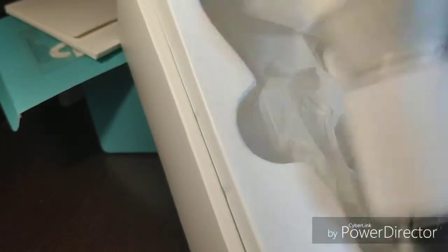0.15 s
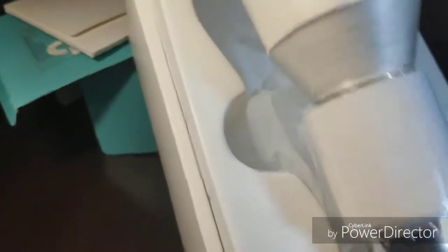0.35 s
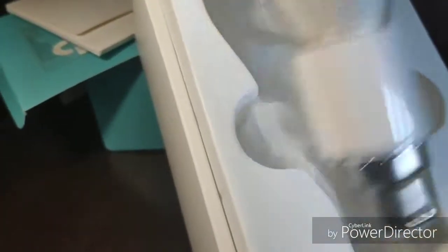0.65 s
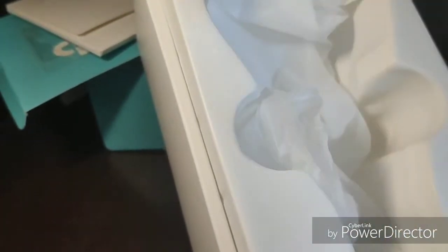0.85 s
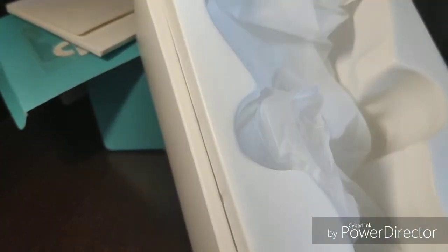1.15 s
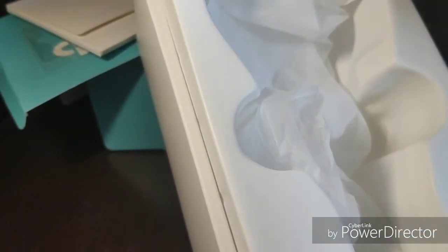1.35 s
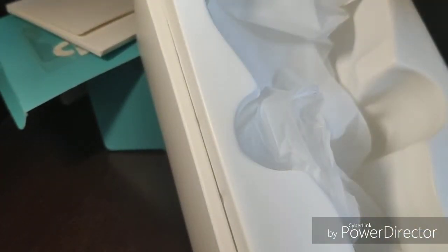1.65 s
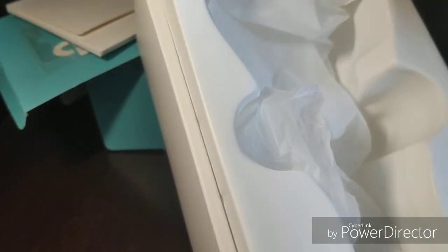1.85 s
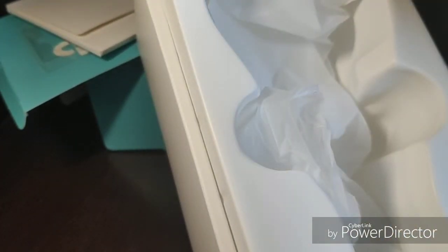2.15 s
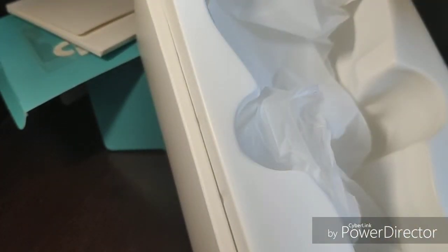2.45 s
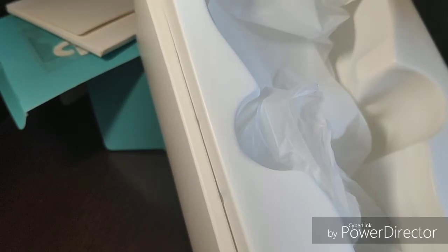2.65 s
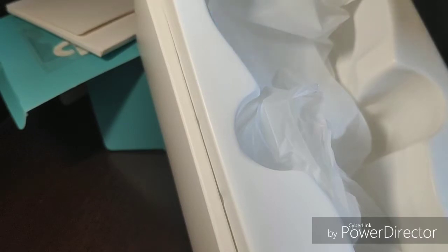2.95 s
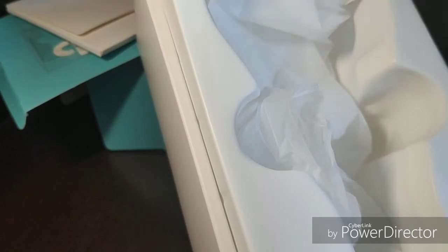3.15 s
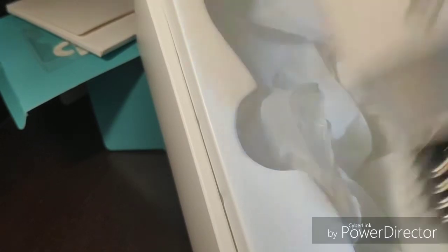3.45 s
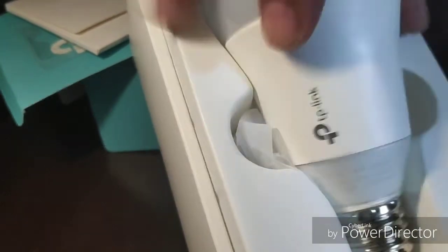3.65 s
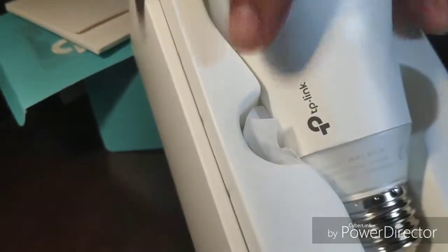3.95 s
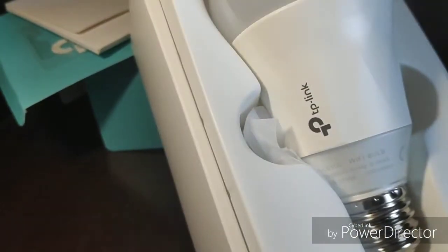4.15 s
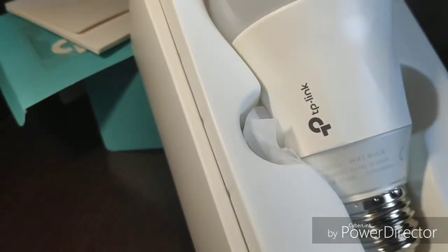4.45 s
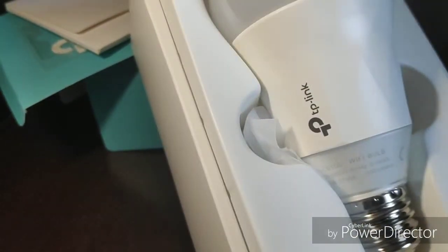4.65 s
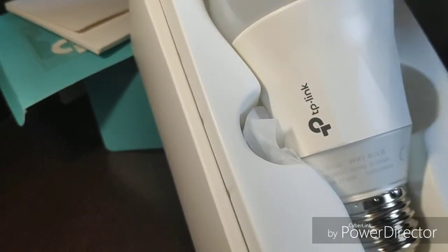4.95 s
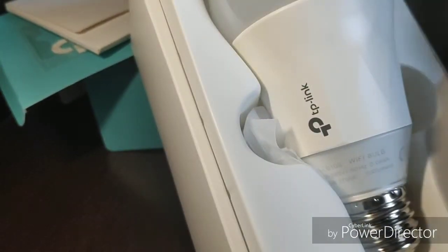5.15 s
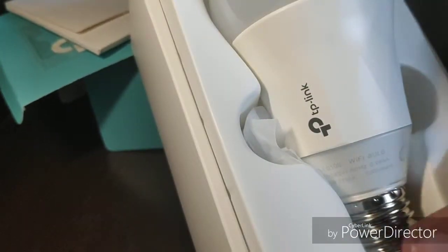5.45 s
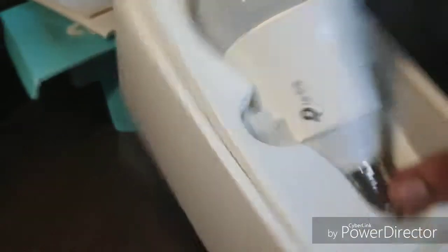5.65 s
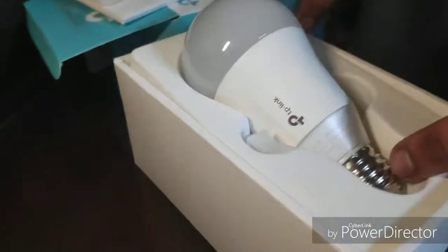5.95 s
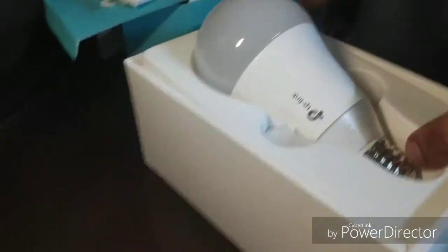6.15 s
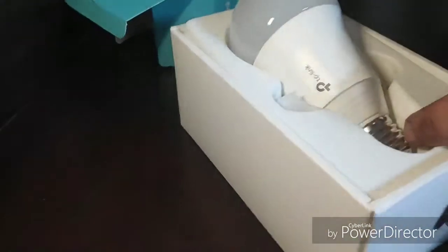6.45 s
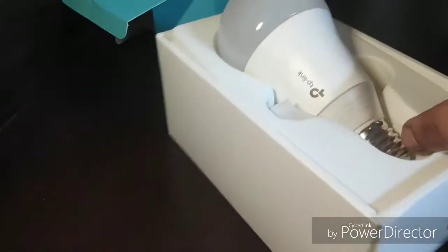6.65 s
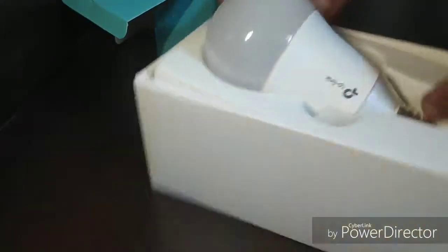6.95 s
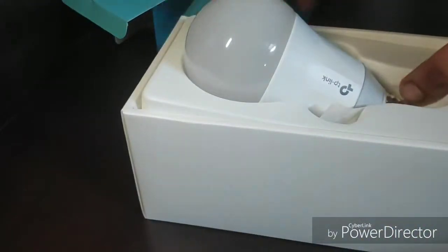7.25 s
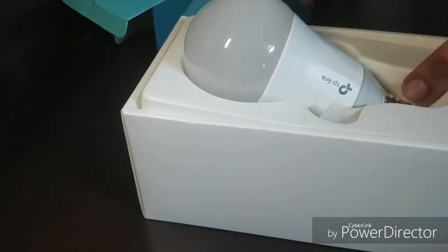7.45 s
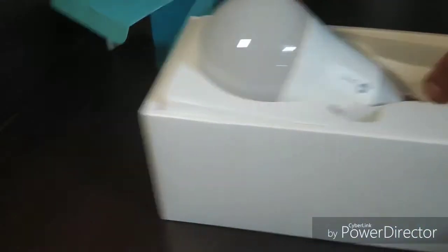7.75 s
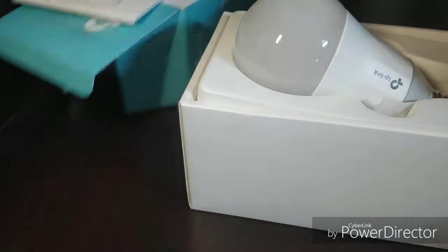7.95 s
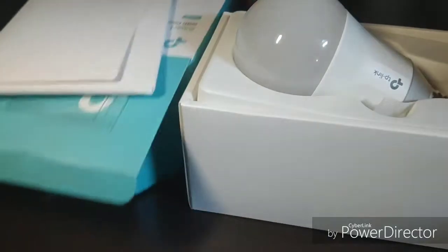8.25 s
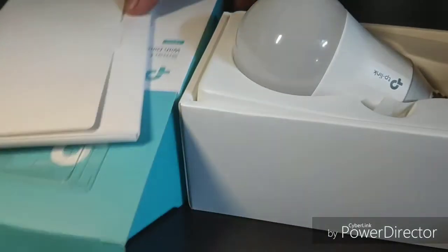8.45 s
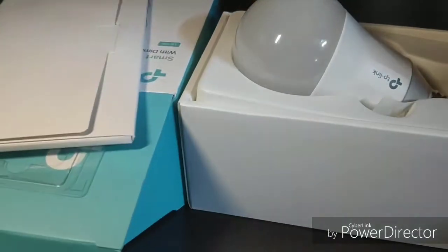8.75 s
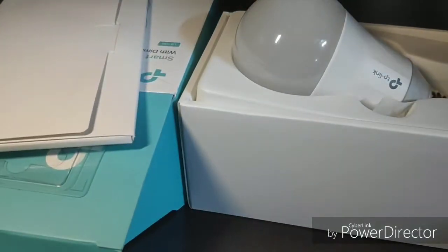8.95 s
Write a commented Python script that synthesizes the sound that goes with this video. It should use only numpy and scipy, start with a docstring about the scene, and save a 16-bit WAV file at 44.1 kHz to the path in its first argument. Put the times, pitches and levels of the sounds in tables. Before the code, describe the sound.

A light bulb knocks into a cardboard tray, paper crackles, then the carton scrapes across a table over a fan's hum.

```python
"""A fan hums in a small room and a hand rumbles on a hand-held recorder throughout.
Close by, a light bulb is set into its paperboard tray: blows ring the carton's panels and thump the table.
Fingers then rub the wrapping paper, which hisses, ticks at its creases and briefly squeaks by stick-slip.
A sharp knock at 3.9 s leaves a hissing tail; more knocks come near 5.8 s. Then the carton is slid about
on the table, hissing, scraping and now and then squeaking."""
import sys
import numpy as np
from scipy import signal
from scipy.fft import rfft, irfft, next_fast_len
from scipy.io import wavfile
from scipy.ndimage import uniform_filter1d

SR = 44100
rng = np.random.default_rng(int(sys.argv[2]) if len(sys.argv) > 2 else 0)


def wav_out(sig):
    """Save sig, one row per channel (or a flat mono array), as 16-bit PCM at SR to the path in sys.argv[1]."""
    wavfile.write(sys.argv[1], SR, np.round(np.clip(np.atleast_2d(sig).T, -1, 1) * 32767).astype(np.int16))


N = 401298
CUTOFF_HZ = 15700


def from_db(db):
    """Decibels to gain."""
    return 10 ** (np.asarray(db) / 20)


def pan(db):
    """Channel gains for a left-minus-right level."""
    return from_db([[db / 2], [-db / 2]])


def unit_rms(x):
    """Scale to an rms of 1."""
    return x / np.sqrt(np.mean(x ** 2) + 1e-20)


def in_time(points):
    """Read a (seconds, value) curve at every sample."""
    return np.interp(np.arange(N) / SR, *np.transpose(points))


def at_hz(points, hz):
    """Read a (Hz, value) curve on a log-frequency axis."""
    point_hz, value = np.transpose(points)
    return np.interp(np.log(np.maximum(hz, 1)), np.log(point_hz), value)


def drift(rate_hz):
    """Random curve through unit-variance points."""
    steps = unit_rms(rng.standard_normal(N // 8))
    return np.interp(np.arange(N) / SR * rate_hz, np.arange(len(steps)), steps)


def colour(x, spectrum, size=1024):
    """Minimum-phase filter with the given spectrum."""
    gain = from_db(at_hz(spectrum, np.fft.rfftfreq(size, 1 / SR)))
    cepstrum = irfft(np.log(gain))[:size // 2]
    cepstrum[1:] *= 2
    response = irfft(np.exp(rfft(cepstrum, size)))[:size // 2]
    return signal.oaconvolve(x, response[None], axes=-1)[:, :x.shape[-1]]


def stereo_noise(coherence, size=N):
    """White noise whose channels are alike by frequency."""
    padded = next_fast_len(size, True)
    mid, side = rfft(rng.standard_normal((2, padded)))
    alike = np.clip(at_hz(coherence, np.fft.rfftfreq(padded, 1 / SR)), 0, 1)
    spectra = np.sqrt(1 + alike) * mid + np.sqrt(1 - alike) * side * [[1], [-1]]
    return unit_rms(irfft(spectra, padded)[:, :size])


def resonate(x, hz, width_hz):
    """One resonance with a peak gain of 1."""
    r = np.exp(-np.pi * width_hz / SR)
    poles = [1, -2 * r * np.cos(2 * np.pi * hz / SR), r * r]
    return signal.lfilter(np.array([1, 0, -1]) * (1 - r * r) / 2, poles, x + 1e-18)


def at_level(x, db):
    """Give a short sound the energy of 5 ms at this level."""
    return from_db(db) * x * np.sqrt(.005 * SR / np.mean(np.sum(x ** 2, axis=-1)))


def add(out, start_s, sound):
    """Mix a short sound in."""
    at = int(start_s * SR)
    out[:, at:at + sound.shape[1]] += sound[:, :N - at]


def strokes(rows, attack_s, release_db_per_s, arch_db=6.5):
    """Gain of (start s, length s, dB) strokes: each sets in, is loudest midway and dies away."""
    t, power = np.arange(0, N, 32) / SR, 1e-12
    for start_s, length_s, db in rows:
        rise = np.clip((t - start_s) / attack_s, 0, 1)
        progress = np.clip((t - start_s) / length_s, 0, 1)
        release_db = release_db_per_s * np.maximum(t - start_s - length_s, 0)
        power += (rise * from_db(db - arch_db * (2 * progress - 1) ** 2 - release_db)) ** 2
    return np.interp(np.arange(N) / SR, t, np.sqrt(power))


# Diffuse sound. Each row: frequency in Hz, channel coherence 0-1.
ROOM_COHERENCE = [(40, 0), (150, 1), (500, 0.47), (1100, 0.37), (2500, 0)]
# Air noise. Each row: frequency in Hz, gain in dB.
FAN_SPECTRUM = [(30, -2), (130, -1), (280, 3), (380, 0), (470, -1.5), (800, -3.5), (1150, 3), (1320, -2),
                (1500, -7.5), (2400, -9.5), (4000, -16), (6500, -22.5), (10000, -27), (15500, -22)]


def fan(air_db=-45.5, hum_db=-56, hum_hz=333.4, waver_hz=5.69, flutter_db=2.5):
    """Steady air noise with a wavering hum."""
    air = unit_rms(colour(stereo_noise(ROOM_COHERENCE), FAN_SPECTRUM, size=8192))
    phase = 2 * np.pi * np.cumsum(hum_hz + waver_hz * drift(40)) / SR
    hum = unit_rms(np.sin(phase) * from_db(flutter_db * drift(22)))
    return from_db(air_db) * air + from_db(hum_db) * hum * pan(-3)


# Resting hand. Each row: time in seconds, level in dB before trim.
GRIP_REST = [(0.0, -38.5), (2.05, -45), (2.51, -36.5), (3.45, -50.5), (3.83, -39), (5.09, -57.5),
             (5.58, -46.5), (8.31, -48), (8.64, -37), (9.1, -50)]
# Grip shifts. Each row: start in seconds, length in seconds, level in dB, left minus right in dB.
GRIP_SHIFTS = [(1.23, 0.17, -33, 9), (1.349, 0.084, -28, 12), (2.223, 0.2, -32.5, -2),
               (2.86, 0.29, -33, -2), (3.483, 0.072, -41.5, 7), (3.624, 0.52, -45, -13),
               (4.434, 0.047, -36, 5), (5.568, 0.075, -33.5, 0), (6.267, 0.27, -36, 5),
               (7.4, 0.29, -37.5, -3), (8.383, 0.17, -33, 5), (8.587, 0.65, -35.5, 11.5)]
# Case rumble. Each row: frequency in Hz, gain in dB.
CASE_SPECTRUM = [(12, -4.5), (30, 1), (55, -3.5), (90, -7.5), (160, -16.5), (300, -25), (700, -56.5),
                 (2000, -66)]
# Case-borne sound. Each row: frequency in Hz, channel coherence 0-1.
CASE_COHERENCE = [(20, 0.09), (300, 0.52)]


def grip(rest_trim_db=-1, lumpy_db=3.5, creak_hz=98, creak_db=-9.5):
    """The hand rumbles through the recorder's case; a hard squeeze adds a dull creak."""
    shoves = stereo_noise(CASE_COHERENCE) * from_db(lumpy_db * drift(30))
    resting = from_db(in_time(GRIP_REST) + rest_trim_db) * pan(2)
    shifting = []
    for side in (1, -1):
        rows = [(s, length_s, db + side * pan_db / 2) for s, length_s, db, pan_db in GRIP_SHIFTS]
        shifting.append(strokes(rows, attack_s=0.013, release_db_per_s=260))
    force = np.hypot(resting, shifting)
    rumble = unit_rms(colour(shoves, CASE_SPECTRUM, size=8192))
    creak = unit_rms(resonate(resonate(shoves, creak_hz, 48), creak_hz, 48))
    return (rumble + from_db(creak_db) * creak * force / force.max()) * force


# Close sound. Each row: frequency in Hz, channel coherence 0-1.
NEAR_COHERENCE = [(100, 0.95), (1000, 0.81), (3000, 0.53), (15000, 0.2)]


def contact(crush_s, snap, rise_s=0.00045, size=4096):
    """One sharp push of height snap, then a dying burst of tiny slips as the fibres give."""
    t = np.arange(size) / SR
    slips = stereo_noise(NEAR_COHERENCE, size) * np.exp(-t / crush_s) * (1 - np.exp(-t / rise_s))
    slips /= np.sqrt(np.sum(slips ** 2) / 2)
    return slips + snap * (t == 0)


# Blows on the carton. Each row: start in seconds, panel, hollow, crack and thump levels in dB,
# crush time in seconds, left minus right of the ringing in dB, panel pitch ratio.
CARTON_KNOCKS = [(0.2748, -12, -29, -15, -33, 0.0026, -1, 1),
                 (0.2825, -25, -34, -32, -36, 0.0012, -1, 1.08),
                 (0.2985, -24, -36, -28, -40, 0.0025, 1, 1.1), (0.3082, -24, -31, -28, -42, 0.002, -1, 1),
                 (0.3122, -24, -32, -36, -42, 0.0025, 0, 0.9),
                 (0.3198, -23.5, -38, -32, -45, .002, -3, 1.02),
                 (0.3369, -11.5, -23, -22.5, -28, 0.0008, 0, 1.02),
                 (0.340, -20, -30, -28, -36, 0.001, 0, 1.05), (0.3782, -27, -33, -46, -39, 0.001, 0, 1),
                 (0.5224, -18, -29, -37, -34, 0.0009, -1, 1.06), (0.556, -33, -36, -46, -42, .003, 0, 0.9),
                 (0.621, -37, -35, -42, -36, 0.005, 2, 0.89),
                 (3.737, -31.5, -32, -36, -52, 0.0075, -1.5, 0.95),
                 (3.776, -38, -31, -50, -55, 0.0015, 3, 0.96), (3.7885, -50, -40, -35, -55, 0.001, -6, 1),
                 (3.902, -28.5, -25, -13, -31, 0.0022, -6, 1.22),
                 (5.745, -36, -35, -44, -47, 0.03, -2, 0.6), (5.8472, -15, -22, -9, -17, 0.0035, -2, 0.82),
                 (5.8505, -16, -30, -18, -30, .0025, 0, 1.43),
                 (5.854, -19.5, -16, -15.5, -16, 0.0035, -3, 0.6)]
# Panel resonances. Each row: frequency in Hz, width in Hz, gain in dB.
PANEL_MODES = [(296, 210, -7), (523, 158, -1.5), (880, 157, 4), (1150, 210, 0), (1880, 280, -1),
               (2350, 560, -4), (2850, 600, -5.5)]
# Edge crack. Each row: frequency in Hz, gain in dB.
CRACK_SPECTRUM = [(100, -5.5), (300, -3), (900, 1.5), (1700, 5), (2400, 4.5), (3200, 0.5), (4100, 2),
                  (5400, 4), (7000, 2), (9500, -1), (15500, 9)]


def knocks():
    """A blow cracks at the edge, rings the panels and the tray's hollow, and thumps the table."""
    out = np.zeros((2, N))
    for start_s, panel_db, hollow_db, crack_db, thump_db, crush_s, pan_db, pitch in CARTON_KNOCKS:
        force, push = contact(crush_s, snap=1.3), contact(crush_s, snap=0.89)
        # a blunt blow, with little crack, spares the high modes
        tilt_db_per_octave = 0.79 * min(crack_db - panel_db - 0.5, 0)
        panels = 0
        for k, (hz, width_hz, db) in enumerate(PANEL_MODES):
            gain = from_db(db + tilt_db_per_octave * max(np.log2(hz / 1000), 0))
            panels += (-1) ** k * gain * resonate(force, hz * pitch, width_hz)
        crack = at_level(colour(contact(crush_s, snap=0.2), CRACK_SPECTRUM), crack_db)
        hollow = at_level(resonate(push, hz=560, width_hz=46), hollow_db)
        thump = at_level(resonate(push, hz=150, width_hz=75), thump_db)
        ringing = at_level(panels, panel_db) - hollow - thump
        add(out, start_s, ringing * pan(pan_db) + crack)
    return out


def room(x, tail_db=-13, boom_db=-9.5, build_s=0.0008, size=32768):
    """A diffuse tail swells and dies, treble first; the low room modes boom on longest."""
    treble_t60_s, mid_t60_s, boom_t60_s = 0.35, 0.43, 0.55
    treble_hz, boom_hz, boom_width_hz = 7040, 140, 130
    t = np.arange(size) / SR
    echoes = stereo_noise(ROOM_COHERENCE, size) * (1 - np.exp(-t / build_s))
    dull = signal.sosfiltfilt(signal.butter(2, treble_hz, fs=SR, output="sos"), echoes)
    tail = dull * from_db(-60 * t / mid_t60_s) + (echoes - dull) * from_db(-60 * t / treble_t60_s)
    modes = resonate(resonate(echoes, boom_hz, boom_width_hz), boom_hz, boom_width_hz)
    boom = modes * from_db(-60 * t / boom_t60_s)
    response = (from_db(tail_db) * tail + from_db(boom_db) * boom) / np.sqrt(np.sum(tail ** 2) / 2)
    return signal.oaconvolve(x, response, axes=-1)[:, :N]


def rasp(x, depth_db, size=512):
    """Patches of the surface catch and sing for some 20 ms, each at its own pitch."""
    frames = signal.stft(x, nperseg=size)[2]
    patches = rng.standard_normal(frames.shape[1:])
    patches = uniform_filter1d(uniform_filter1d(patches, size=4, axis=0), size=3, axis=1)
    return signal.istft(frames * from_db(depth_db * unit_rms(patches)), nperseg=size)[1][:, :N]


def friction(slips, spectrum, grain_db, pressure_db):
    """Countless tiny slips, roughened by surface grain and wavering hand pressure."""
    rough = slips * from_db(grain_db * drift(2500) + pressure_db * drift(90))
    return unit_rms(colour(rough, spectrum, size=2048))


# Carton or bulb sliding. Each row: start in seconds, length in seconds, hiss in dB, scrape in dB.
CARD_SLIDES = [(0.34, .03, -57, -55), (0.545, 0.083, -36.5, -40.5), (3.685, 0.1, -57, -45),
               (5.63, 0.2, -51, -45), (5.81, 0.14, -56, -41.5), (6.047, 0.47, -50, -51),
               (6.095, 0.03, -50, -47), (6.263, 0.23, -40, -48), (6.517, 0.74, -55.5, -58),
               (6.595, 0.03, -45, -55), (6.697, 0.03, -48, -55), (6.915, 0.25, -37.5, -43),
               (7.55, 0.11, -53, -56), (7.829, 0.22, -38, -45), (7.993, 0.31, -39.5, -53.5),
               (8.245, 0.15, -42, -49), (8.398, 0.21, -42, -49.5)]
# Card hiss and low scrape. Each row: frequency in Hz, gain in dB.
HISS_SPECTRUM = [(300, -12), (1200, -10), (2700, -7), (4000, -1), (6300, 2.5), (8000, -1), (9500, -1.5),
                 (12500, 2), (15500, 4.5)]
SCRAPE_SPECTRUM = [(150, 1.5), (550, 4.5), (900, -0.5), (1400, 0), (2800, 3.5), (4500, -4), (8000, -30),
                   (15000, -6)]


def sliding(noise, attack_s=0.046, release_db_per_s=175):
    """Sliding card hisses evenly and scrapes lower down."""
    slides = np.array(CARD_SLIDES)
    hiss_gain = strokes(slides[:, [0, 1, 2]], attack_s, release_db_per_s)
    scrape_gain = strokes(slides[:, [0, 1, 3]], attack_s, release_db_per_s)
    slips = rasp(noise, depth_db=3)
    hiss = friction(slips, HISS_SPECTRUM, grain_db=0.5, pressure_db=0.8)
    scrape = friction(slips[:, ::-1], SCRAPE_SPECTRUM, grain_db=-1, pressure_db=3.5)
    return hiss_gain * hiss + scrape_gain * scrape


# Creasing paper. Each row: start in seconds, level in dB, crush time in seconds.
CREASE_TICKS = [(0.469, -52, .002), (0.603, -31, .004), (0.783, -52, .003), (1.701, -37, 0.0049),
                (1.732, -35.5, 0.0047), (1.764, -38, 0.0037), (1.815, -40, .005), (1.833, -34, 0.0059),
                (1.849, -32, .005), (1.86, -25, 0.0029), (2.031, -45, .004), (2.079, -30, 0.0063),
                (2.289, -38, 0.0014), (2.2995, -27, 0.0016), (2.364, -33, 0.0039), (2.678, -46, .006),
                (2.693, -42, .003), (2.750, -23, 0.0028), (3.703, -38, 0.001), (3.725, -35, .001),
                (3.751, -36, .001), (3.847, -36, 0.00083), (5.039, -49, .001), (5.116, -55, .001),
                (5.164, -46, .002), (5.178, -46, 0.0014), (6.224, -43, .004), (7.31, -53, .004),
                (8.472, -36, 0.0036)]
# Paper snap. Each row: frequency in Hz, gain in dB.
TICK_SPECTRUM = [(300, -19), (2000, -2), (3800, -6), (5000, 1), (6300, 7.5), (10000, 0.5), (13000, 14),
                 (15500, 6)]


def ticks():
    """Creases snap too lightly to move the panels."""
    out = np.zeros((2, N))
    for start_s, db, crush_s in CREASE_TICKS:
        add(out, start_s, at_level(colour(contact(crush_s, snap=0.18), TICK_SPECTRUM), db))
    return out


def crackle(snaps_per_s=900, spread_db=8, level_db=-11):
    """Single paper fibres snag and snap at random, a few much louder than the rest."""
    snaps = (rng.random(N) < snaps_per_s / SR) * rng.standard_normal(N)
    snaps *= from_db(rng.uniform(-spread_db, spread_db, N))
    return from_db(level_db) * unit_rms(colour(snaps[None], TICK_SPECTRUM))


# Fingers on the wrapping paper, and the hissing tail of the sharp knock at 3.9 s.
# Each row: start in seconds, length in seconds, level in dB.
RUSTLES = [(0.74, 0.071, -52), (1.40, 0.11, -41.5), (1.50, 0.16, -41), (1.688, 0.062, -39),
           (1.81, 0.12, -37), (2.075, 0.11, -33.5), (2.283, 0.034, -36.5), (2.345, 0.19, -38),
           (2.668, .03, -43.5), (2.745, 0.14, -38), (3.643, 0.047, -38.5), (3.73, 0.064, -44),
           (3.912, 0.088, -40), (4.87, 0.38, -53), (5.37, 0.3, -54), (5.685, 0.09, -37.5),
           (5.76, 0.12, -44), (8.845, 0.014, -42)]
# Hiss of a rustle. Each row: frequency in Hz, gain in dB.
RUSTLE_SPECTRUM = [(300, -10), (1200, -1.5), (2500, -2.5), (4000, -1), (5200, 1), (6300, 1.5), (8000, 3.5),
                   (9500, 2), (12500, 6.5), (15500, 8)]


def rustling(noise):
    """Hiss and crackle of rubbed paper, and of the tail of the knock at 3.9 s."""
    gain = strokes(RUSTLES, attack_s=0.01, release_db_per_s=263)
    hiss = friction(rasp(noise, depth_db=4.2), RUSTLE_SPECTRUM, grain_db=2.5, pressure_db=2.5)
    return gain * (hiss + crackle())


# Stick-slip. Each row: middle in seconds, length in seconds, slip rate in Hz, glide in Hz per second,
# share of rate lost at the ends, level in dB, overtone corner in Hz, drop at the ends in dB,
# jitter as a share of rate.
CARD_SQUEAKS = [(1.837, .024, 2370, 4000, 0.0073, -43, 13000, 20, 0.03),
                (1.855, 0.028, 2543, 1000, 0.011, -23.5, 13000, 24, 0.029),
                (5.843, 0.012, 3570, 0, 0.029, -25, 5000, 14, 0.026),
                (7.025, 0.06, 1530, 2200, .06, -45.5, 3000, 6, .065),
                (7.08, 0.06, 1440, -3500, .05, -45, 3000, 7, .065),
                (8.076, .026, 5330, -12000, 0.034, -46, 5200, 17, 0.037),
                (8.519, .07, 587, 6500, 0, -50, 600, 12, 0.044)]
# Weight of the harmonics. Each row: frequency in Hz, gain in dB.
SQUEAK_SPECTRUM = [(1400, -2), (2600, 0), (4400, -5), (5200, -1), (7700, 3), (10200, -4), (12800, -2),
                   (16000, -14)]


def squeaks(rough_db=3.5, fall_db_per_octave=18):
    """Slips lock into a rhythm and make a rough tone; level and pitch arch with the pressure."""
    out, t = np.zeros((2, N)), np.arange(N) / SR
    waver, rough = drift(900), from_db(rough_db * drift(1200))
    for middle_s, length_s, hz, glide_hz_per_s, sag, db, corner_hz, edge_db, jitter in CARD_SQUEAKS:
        on = np.abs(t - middle_s) < length_s / 2
        offset_s = t[on] - middle_s
        slack = (2 * offset_s / length_s) ** 2
        slip_hz = (hz * (1 - sag * slack) + glide_hz_per_s * offset_s) * (1 + jitter * waver[on])
        phase = 2 * np.pi * np.cumsum(slip_hz) / SR
        tone = 0
        for k in range(1, 6):
            if k * hz < CUTOFF_HZ:
                fall_db = fall_db_per_octave * max(np.log2(k * hz / corner_hz), 0)
                tone += from_db(at_hz(SQUEAK_SPECTRUM, k * hz) - fall_db) * np.sin(k * phase)
        out[:, on] += unit_rms(tone * rough[on]) * from_db(db - edge_db * slack)
    return out


# Where the hands work. Each row: time in seconds, left minus right in dB.
HAND_PAN = [(3.9, 0), (4.9, 7), (5.5, 6), (5.7, 1.5), (6.4, 0.5), (7.0, 4.5), (7.9, 0.5)]


def scene():
    """Handling sounds over the fan and the grip; knocks, ticks and squeaks excite the room."""
    contacts = squeaks() + knocks() + ticks()
    background = grip() + fan()
    reverb = room(contacts)
    noise = stereo_noise(ROOM_COHERENCE)
    hand_gains = from_db(in_time(HAND_PAN) * [[.5], [-.5]])
    return background + contacts + reverb + (sliding(noise) + rustling(noise)) * hand_gains


# Microphone port resonances. Each row: frequency in Hz, gain in dB.
LEFT_PORT_SPECTRUM = [(100, 2), (700, -1), (880, -2), (1150, -2), (3500, 1), (6000, -2), (8500, 1),
                      (11000, 3), (13000, 2.5), (15500, -3)]
RIGHT_PORT_SPECTRUM = [(100, 2.5), (700, -2), (880, -4.5), (1150, -3), (3300, 1.5), (3950, 0.5), (5000, 2),
                       (6600, 7.5), (9000, 1), (11500, -8.5), (15500, -28)]
# Left port behind the right. Each row: frequency in Hz, phase lag in radians.
LEFT_LAG = [(100, 0.1), (280, 0.08), (540, 0.33), (830, 0.76), (1100, 0.78), (2000, 1.47), (3200, 2.5),
            (6000, 5.5), (12000, 6)]


def record(dry, ceiling=0.8):
    """Each port colours its channel and shifts its phase; peaks are rounded and the top is cut."""
    size = next_fast_len(N, True)
    lag_rad = at_hz(LEFT_LAG, np.fft.rfftfreq(size, 1 / SR))
    left = irfft(rfft(dry[:1], size) * np.exp(-1j * lag_rad), size)[:, :N]
    heard = np.vstack([colour(left, LEFT_PORT_SPECTRUM), colour(dry[1:], RIGHT_PORT_SPECTRUM)])
    rounded = ceiling * np.tanh(heard / ceiling)
    return signal.sosfilt(signal.ellip(10, .3, 80, CUTOFF_HZ, fs=SR, output="sos"), rounded)


dry = scene()
out = record(dry)
wav_out(out)
```